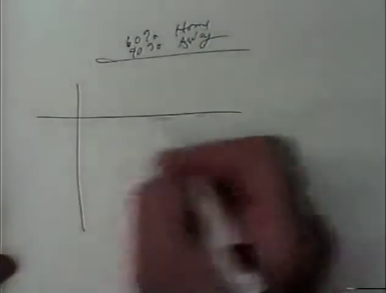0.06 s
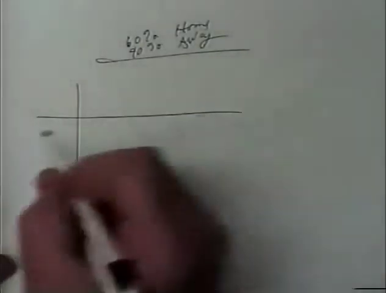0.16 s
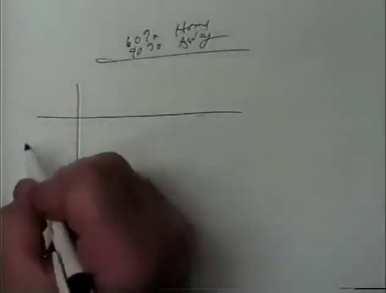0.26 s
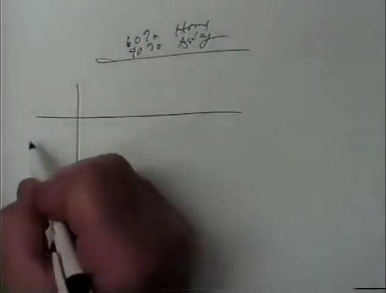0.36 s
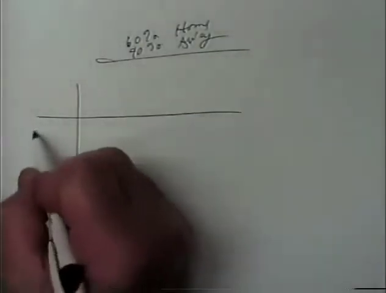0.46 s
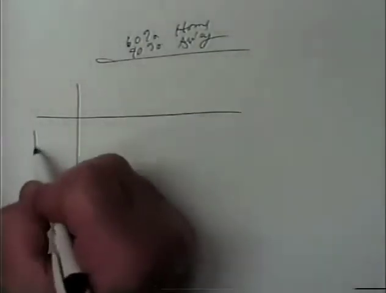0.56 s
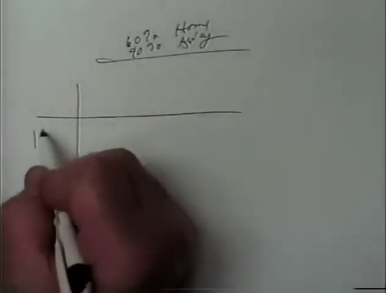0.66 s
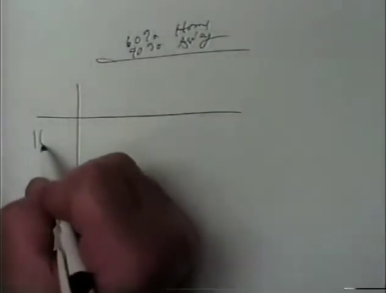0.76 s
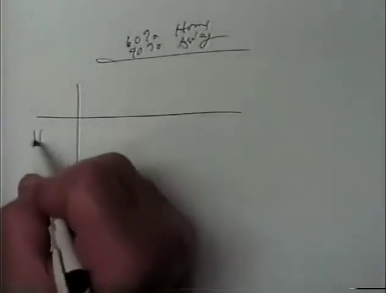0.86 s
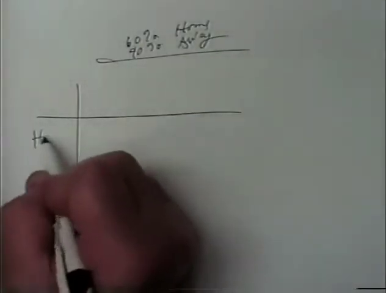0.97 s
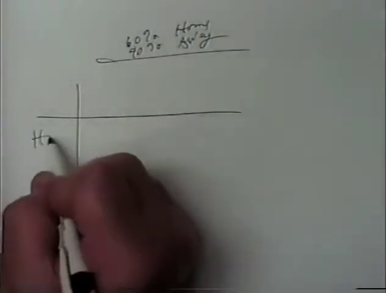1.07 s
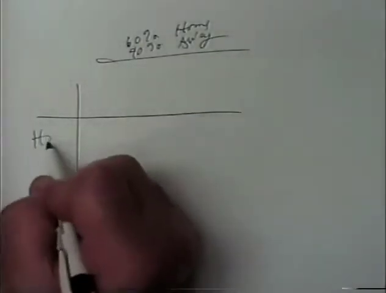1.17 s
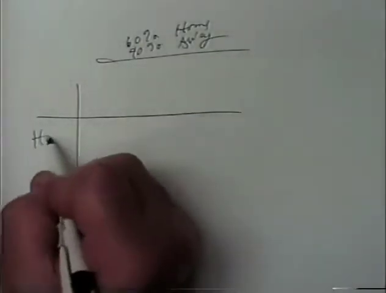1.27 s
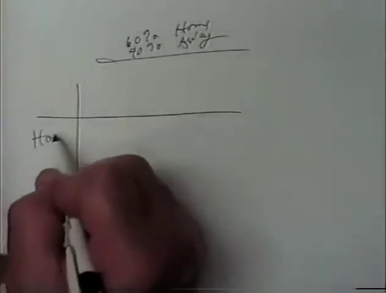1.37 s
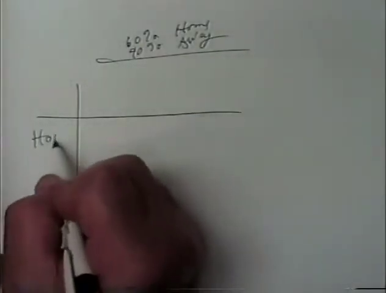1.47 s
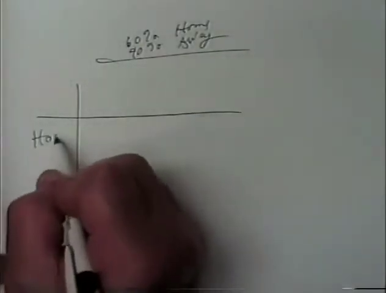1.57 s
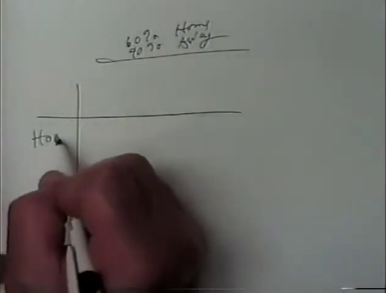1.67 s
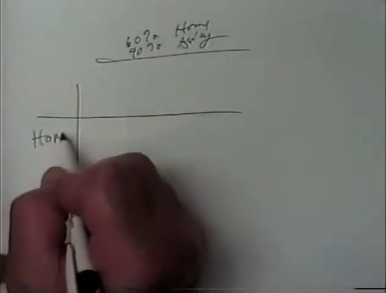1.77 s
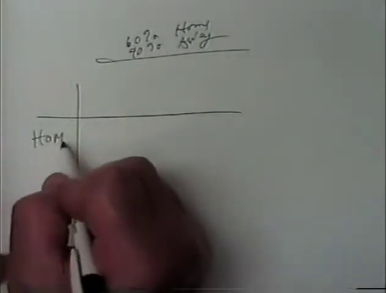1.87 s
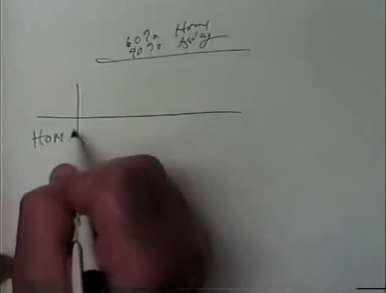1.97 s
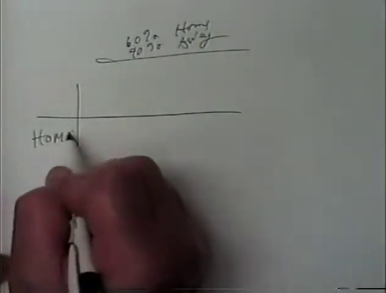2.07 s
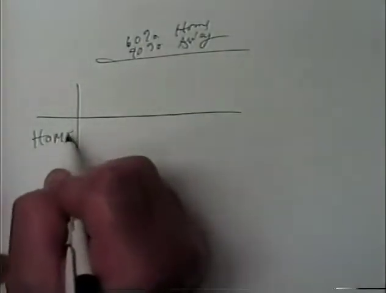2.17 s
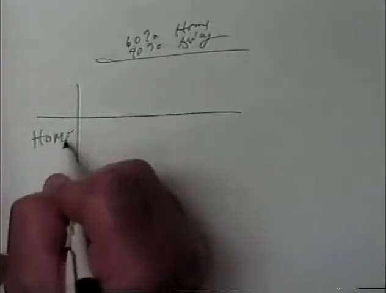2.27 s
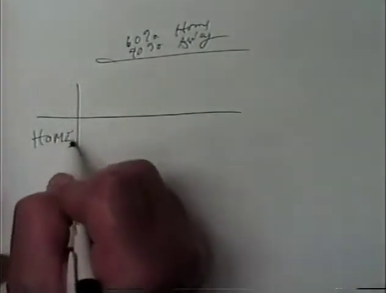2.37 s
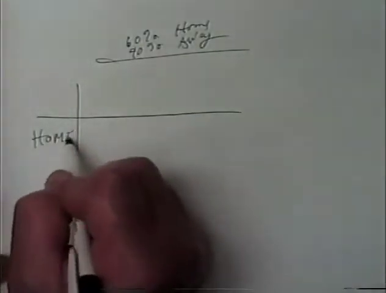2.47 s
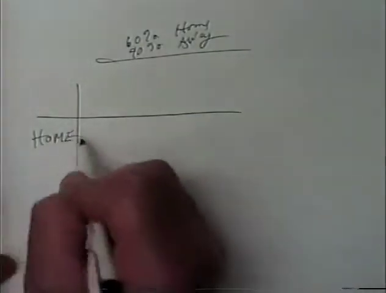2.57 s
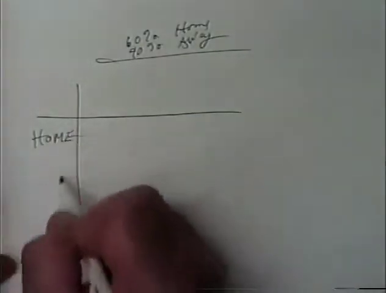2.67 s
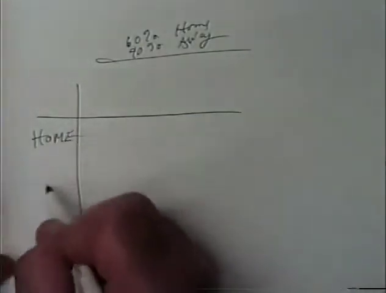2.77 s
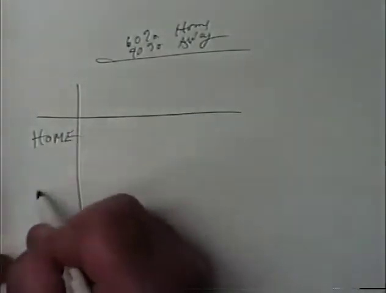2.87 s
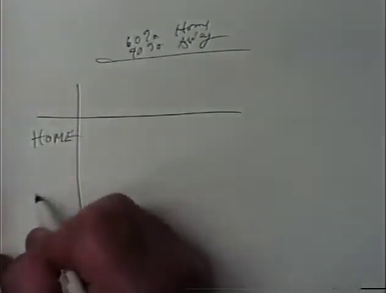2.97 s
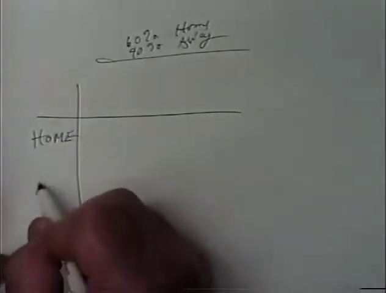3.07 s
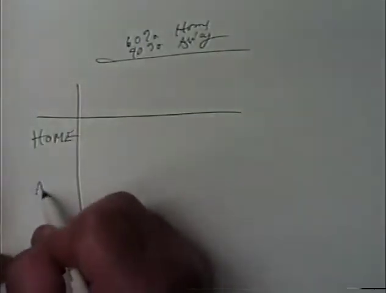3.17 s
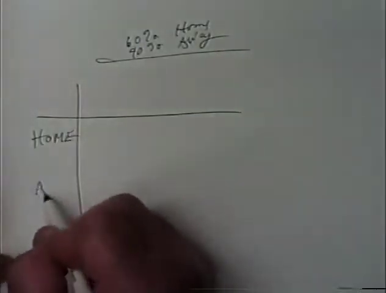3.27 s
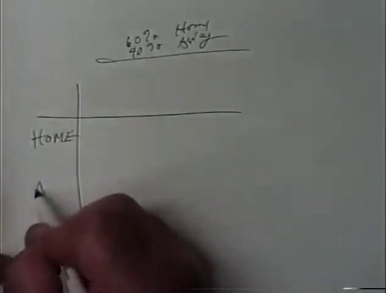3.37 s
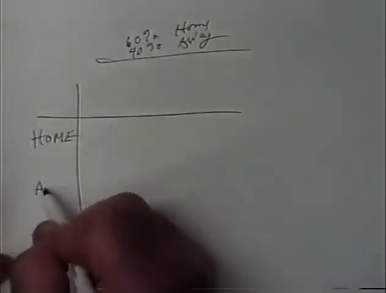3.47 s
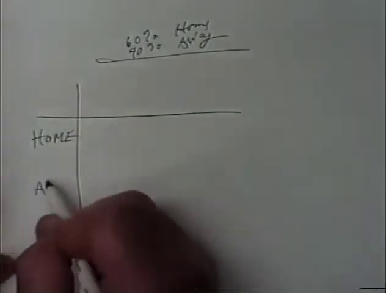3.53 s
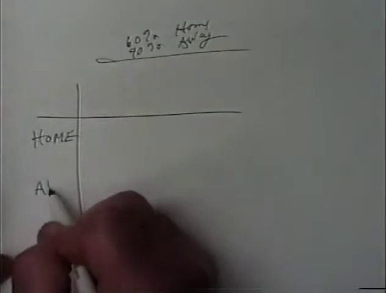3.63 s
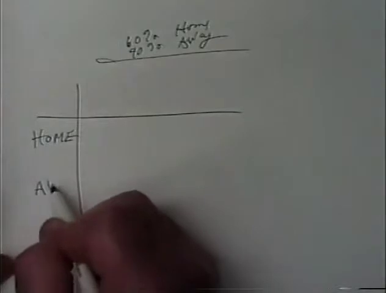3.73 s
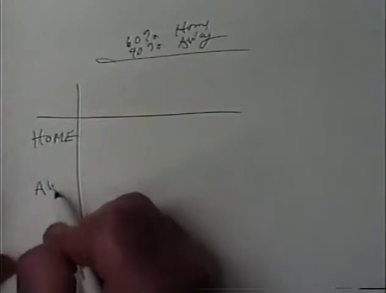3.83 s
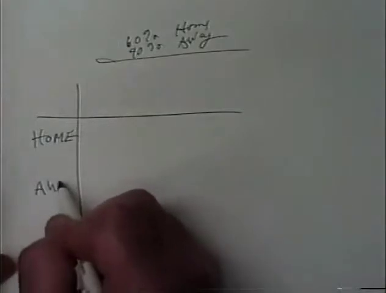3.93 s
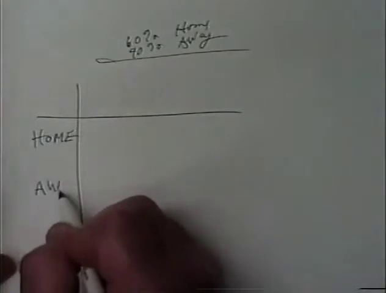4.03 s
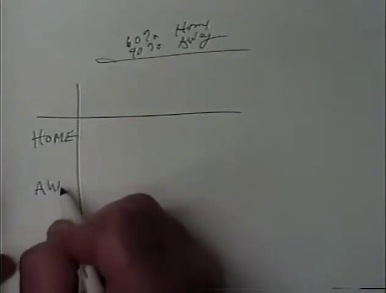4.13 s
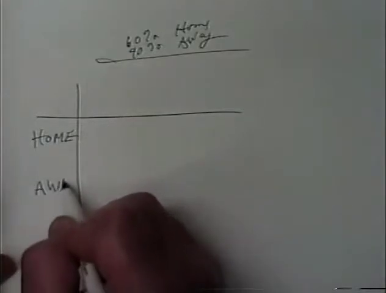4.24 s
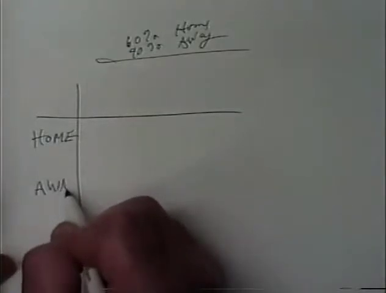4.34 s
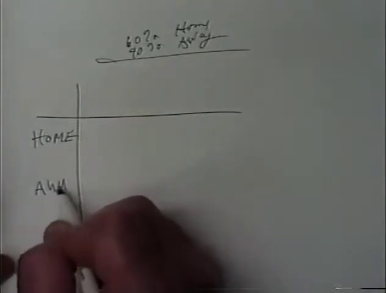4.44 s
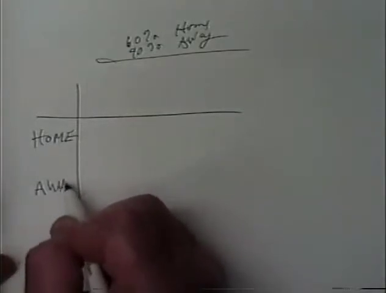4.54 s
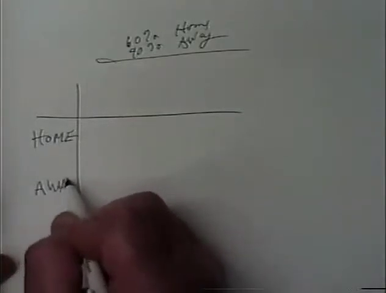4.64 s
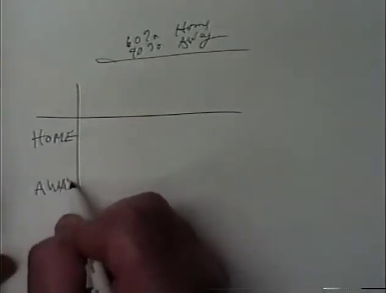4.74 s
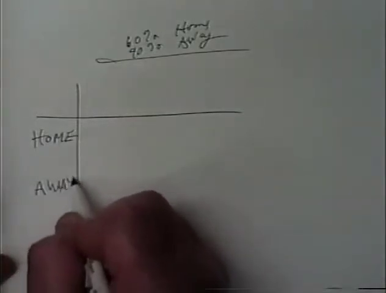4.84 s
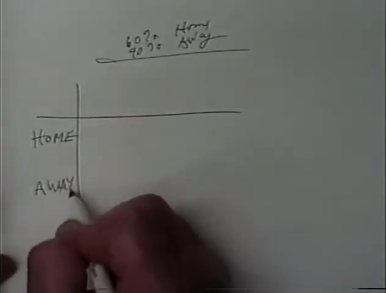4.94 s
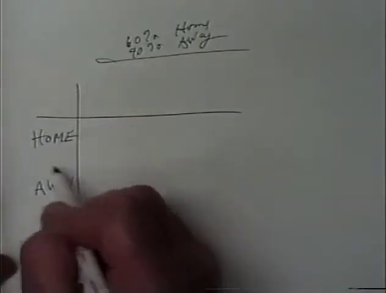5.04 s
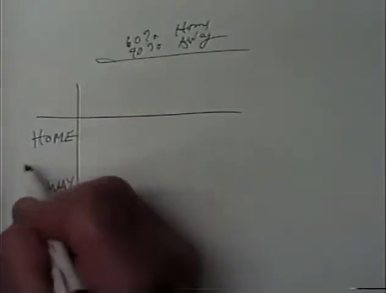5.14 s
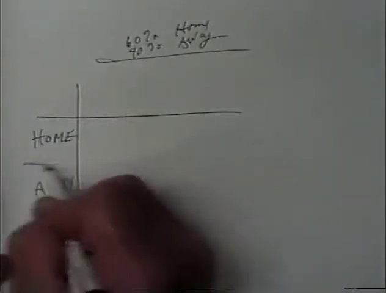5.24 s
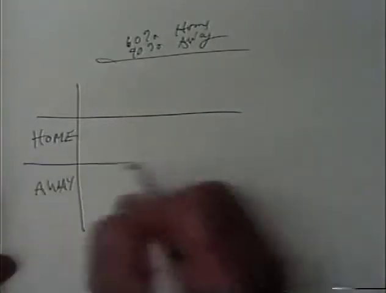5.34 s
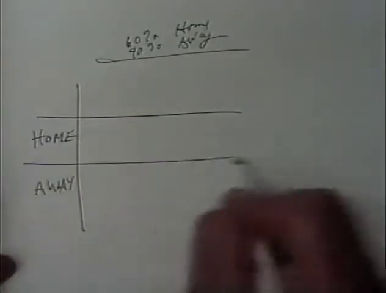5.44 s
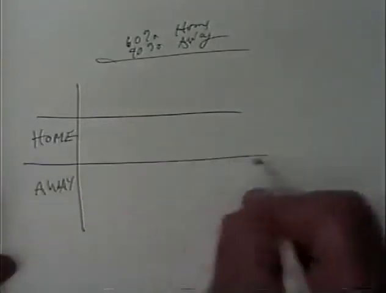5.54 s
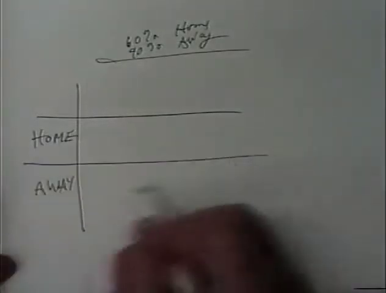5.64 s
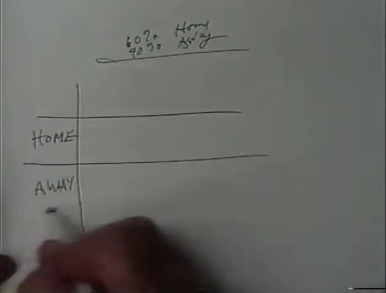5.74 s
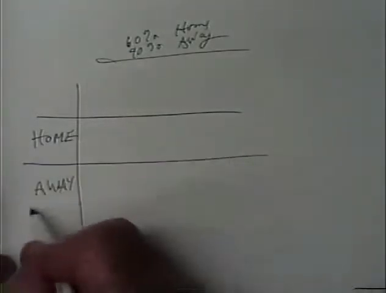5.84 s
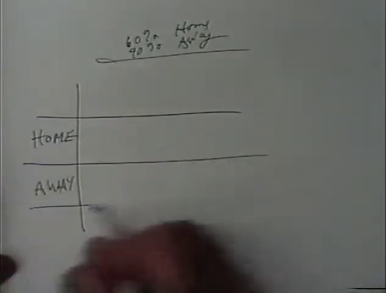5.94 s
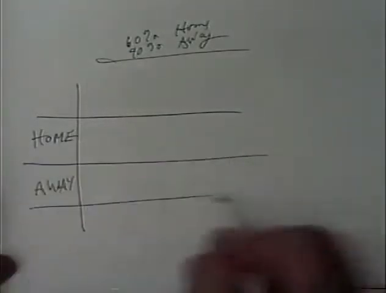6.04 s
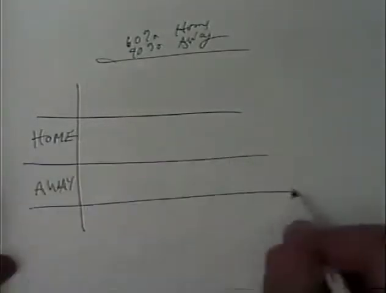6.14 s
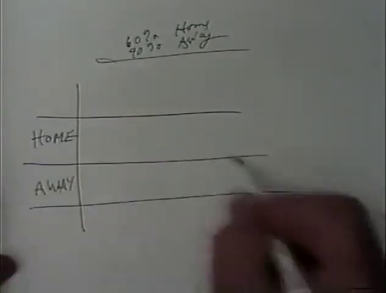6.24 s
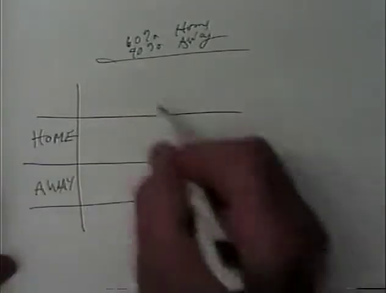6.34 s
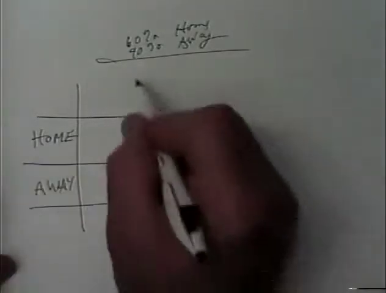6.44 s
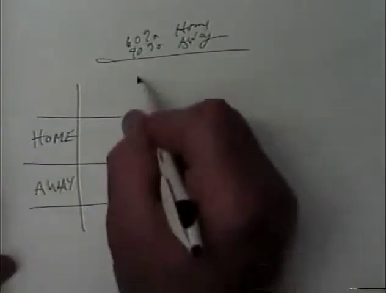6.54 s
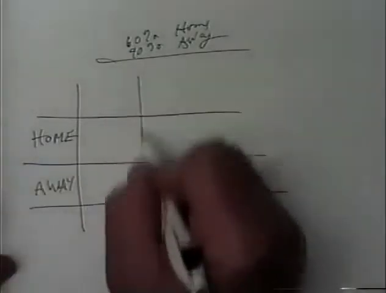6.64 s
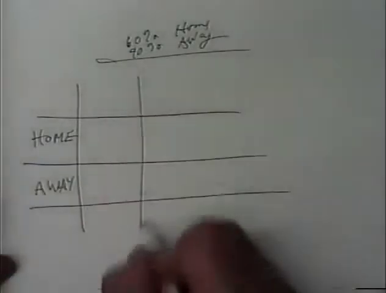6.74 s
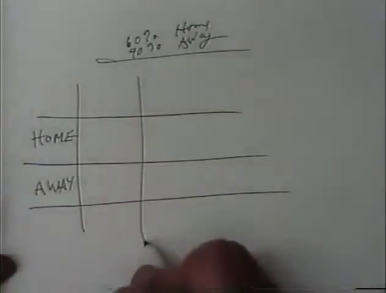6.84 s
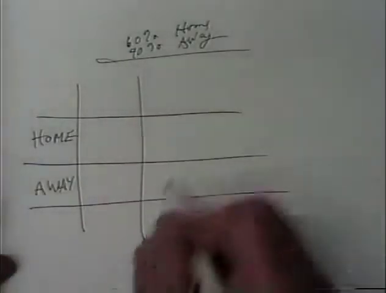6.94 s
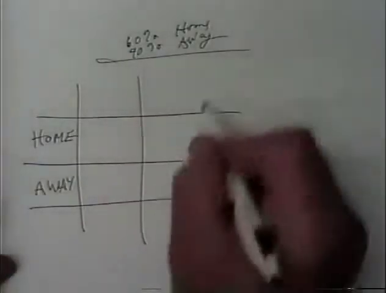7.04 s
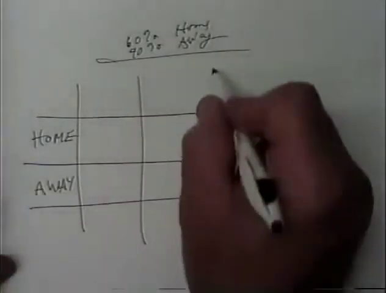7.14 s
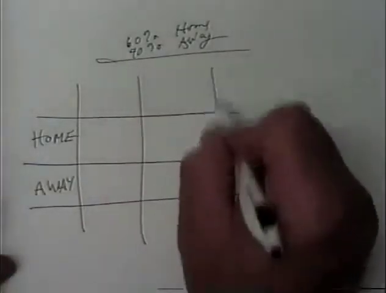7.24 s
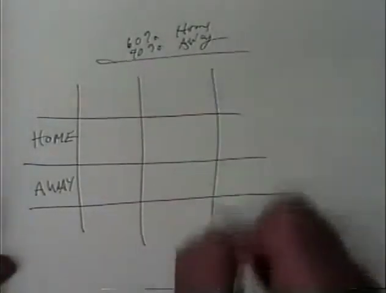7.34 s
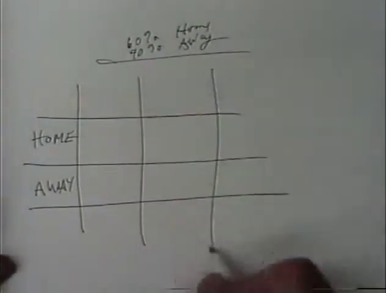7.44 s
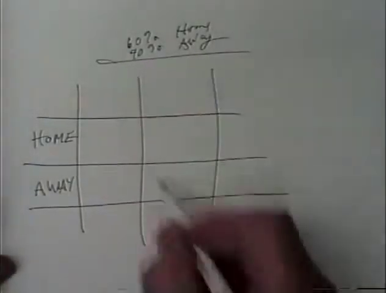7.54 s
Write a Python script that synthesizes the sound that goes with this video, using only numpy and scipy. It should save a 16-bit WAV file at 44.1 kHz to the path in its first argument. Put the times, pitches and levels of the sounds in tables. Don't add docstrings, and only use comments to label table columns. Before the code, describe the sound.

Close, plain sound in a small room with a short reverberation. Throughout, a low 60-hertz hum beats slowly, about once a second, with a fan motor, under soft hiss and a very thin, high steady whistle. At 0 seconds the tail of a long felt-pen scrape dies away. From 0.6 to 2.7, the tip lands with small woody taps and ticks, followed by short, dry, slightly hollow scratches in uneven rhythm; a faint skin rustle brushes paper around 1.4. After a pause, a second similar burst runs from 3.1 to 5.1. Then long ruled strokes: knock at 5.3, scrape swelling to 5.55; firmer thud at 5.95, scrape peaking at 6.2; knock at 6.67, swipe peaking at 6.86; faint hand rustle from 7, strongest thud at 7.3, last swipe peaking near 7.5. Each swipe rises brighter and hissier, then drops quickly.

```python
import sys
import numpy as np
from scipy import signal
from scipy.fft import rfft, irfft
from scipy.io import wavfile
from scipy.ndimage import uniform_filter1d

SR = 44100
rng = np.random.default_rng(int(sys.argv[2]) if len(sys.argv) > 2 else 0)


def inscribe(sig):
    pcm = np.round(np.clip(np.atleast_2d(sig).T, -1, 1) * 32767)
    wavfile.write(sys.argv[1], SR, pcm.astype(np.int16))


def volts(x):
    e = np.asarray(x, float) / 20
    return 10 ** e


N = 335248

# fastest moment t/s, length/s, ring level/dB, flexing re ring/dB, scrape re ring/dB
FIRST_WORD = [(0.682, 0.062, -33.5, -13, -21.5), (0.726, 0.04, -64, -2, -10),
              (0.888, 0.07, -37.5, -25, -16), (1.096, 0.064, -37, -11, -18.5), (1.127, 0.05, -43, -4, -20),
              (1.292, 0.13, -53.5, 4.5, -18), (1.373, 0.049, -47.5, 6.5, -12.5),
              (1.619, 0.059, -46.5, 1, -15), (1.715, 0.064, -40.5, 0, -20), (1.798, 0.046, -50, 4, -20),
              (1.88, 0.074, -55.5, 8.5, -16), (1.966, 0.073, -41.5, -4, -18.5), (2.2, 0.05, -57, 8, -5),
              (2.228, 0.034, -60, 13.5, -9), (2.347, 0.083, -55, 11.5, -12), (2.453, 0.084, -54.5, 8, -15),
              (2.498, 0.042, -60, -1, -12), (2.658, 0.067, -40.5, -10, -14.5), (2.804, 0.05, -64, 1, -10)]
SECOND_WORD = [(3.101, 0.034, -57, -9, -9), (3.189, 0.059, -44.5, 0, -14), (3.218, 0.043, -41, 4.5, -15),
               (3.306, 0.11, -41, -1, -16), (3.397, 0.05, -67, -5, -11), (3.57, 0.093, -52, -3, -15),
               (3.766, 0.07, -43.5, 1, -13.5), (3.884, 0.06, -52.5, 8.5, -12),
               (3.96, 0.033, -40.5, -5, -20), (4.04, 0.064, -37.5, 2, -19), (4.132, 0.053, -47.5, -6, -9),
               (4.226, 0.034, -56.5, 16, -4), (4.318, 0.097, -41, 2, -16.5), (4.41, 0.031, -38.5, -10, -16),
               (4.462, 0.078, -52, -2, -13), (4.546, 0.05, -53, 8, -9), (4.621, 0.064, -51.5, -1, -12),
               (4.819, 0.15, -61, 2, 1), (5.022, 0.074, -37.5, -3, -21), (5.056, 0.019, -40, -9, -17)]
# down t/s, up t/s
WORD_SPANS_S = [
    (.6, 2.9),
    (3.09, 5.15),
]
# ring, flexing, scrape, bright scrape [dB/dB]
LETTER_SLOPES = [1.35, 0.79, 0.99, 0.84]
# ring, flexing, scrape, bright scrape [level/dB]
RESTING_DB = [-72.5, -61.5, -79, -74]

# fastest moment t/s, speeding up/s, slowing down/s, scrape level/dB
RULES = [
    (0.044, 0.6, 0.15, -26),
    (5.55, 0.2137, 0.16, -27.5),
    (6.2, 0.22, 0.13, -26.5),
    (6.858, 0.1726, 0.14, -27.5),
    (7.486, 0.17, .13, -25),
]
# ring/dB, flexing/dB, bright scrape/dB, felt hiss/dB, lag of ring peak/s
RULE_BALANCE = [(-9.5, -8.5, -4, -20, 0.027), (-3.5, -8.5, -2.5, -18.5, 0.027),
                (-6.5, -12, -1.5, -17, 0.032), (-9, -12.5, -13, -22, 0.073),
                (-10.5, -15.5, -10, -20.5, 0.068)]
# ring, flexing, scrape, bright scrape, hiss [dB/dB]
RULE_RISE_SLOPES = [0.43, 0.47, 1.01, 1.18, 0.87]
# same, slowing down as pressure eases [dB/dB]
RULE_FALL_SLOPES = [1.15, 0.98, 1.01, 1.32, 1.15]

# f/Hz, level/dB, t60/s
THUD_MODES = [(150.4, 7.5, .11), (178, -3.5, 0.13), (204.3, -13, 0.47)]
# f/Hz, level/dB, t60/s
RING_MODES = [(313, -23, 0.069), (358.6, -6, 0.15), (393.2, -9.5, 0.21), (461.6, 6.5, 0.068),
              (490.5, -7, 0.2), (538, -13.5, 0.3), (594, -11, 0.079)]
# f/Hz, level/dB, t60/s
TAP_MODES = [(712, -8.5, 0.059), (886, -16.5, 0.19), (944, -8, 0.074), (1052, 17, 0.017),
             (1153, 11.5, 0.018), (1288, -5, 0.065), (1435, -8, 0.091), (1540, -4.5, 0.037)]
# level added to each ring mode/dB, a row an area
AREA_RING_DB = [
    [22.5, -7.5, -11, 3.3, -11.5, 0, -45],
    [9, 7, 0, 1, -7, 0, -39],
    [9, 7, 7, 1, -4, 0, 22],
    [-11, 7, 8, -0.5, -6, 0, -3],
    [-13, 9.5, 7.5, 0, -5, 0, 4],
]
# f/Hz, level per Hz/dB
MARGIN = [(390, -32), (660, -5), (727, -19.5), (867, -16), (1040, 7.5), (1320, -12), (1520, -6),
          (2390, -15.5), (2850, -12), (4500, -24.5), (5850, -54), (9900, -120)]
FAR_RIGHT = [(390, -45), (660, -15), (966, -6.5), (1140, -7), (1250, 2), (1360, -6), (1970, -9.5),
             (2140, -7.5), (2520, -14), (2740, -7), (2960, -20), (5000, -33.5), (6500, -62), (11000, -120)]
ACROSS = [(390, -41), (660, -15), (918, 4), (1000, -9), (1060, 0.5), (1700, -3.5), (2140, -2), (2520, -21),
          (2740, -6.5), (3140, -18.5), (3980, -19.5), (5000, -28), (6500, -58), (11000, -120)]
DOWN = [(390, -46), (660, -15), (911, -2.5), (983, -10.5), (1190, 2), (1330, -2.5), (1440, -5.5),
        (1720, -15), (2250, -23), (2790, -22), (3110, -27.5), (5000, -36.5), (6500, -65), (11000, -120)]
# f/Hz, level per Hz/dB
FELT = [(2650, -24), (4500, -33), (5100, -4.5), (6810, -0.5), (7910, -4.5), (8730, -0.5), (13000, -12.5),
        (15000, -12), (15500, -15)]

# t/s, peak level/dB, thud level/dB, ring re peak/dB, tick re peak/dB
LANDINGS = [(0.594, -29.5, -29, -10.5, -7.5), (0.832, -30.5, -30, -8, -11), (1.033, -34, -35, -10, -16.5),
            (1.571, -36, -34.5, -10, -17), (2.123, -31, -30.5, -11, -9.5), (2.19, -52, -41, -3, -9),
            (2.35, -52, -52, -2, -14), (2.444, -59, -45, 13, -7), (2.604, -29.5, -28.5, -11.5, -11.5),
            (2.794, -47.5, -56, -21, -0.5), (3.079, -38, -41, -18, -26), (3.223, -48, -50, 3.5, -8),
            (3.274, -52, -61, 1, -8), (3.513, -30, -31.5, -15.5, -19), (3.729, -29.5, -30.5, -14.5, -21),
            (4.395, -56, -33, -8, -7), (4.773, -33, -32, -12, -17), (4.959, -37, -33, -9, -12),
            (5.305, -30.5, -32, -11, -17), (5.953, -23.5, -26, -16, -10.5), (6.666, -27, -25.5, -16, -11),
            (7.31, -21, -19.5, -17.5, -10.5)]
CATCHES = [(1.091, -41.5, -49, 4, -9), (1.717, -61, -45, -2, -3), (2.355, -51, -34, 3, -13),
           (3.177, -58, -47, 6, -9), (3.885, -51, -51, 1, -15), (3.955, -64, -41, 5, -9),
           (4.039, -50, -34, 1, -11), (4.086, -63, -37.5, 7, -9), (4.228, -56, -50, 0, -12),
           (4.324, -54, -35.5, -1, -5)]
# f/Hz, level per Hz/dB
TICK = [(970, -30), (1650, 6), (2080, 3.5), (2460, -2), (3080, -7), (3400, -1.5), (4110, -12.5),
        (4940, -20), (5360, -17.5), (12000, -19.5), (15600, -54), (22000, -120)]

# t/s, level/dB
HAND = [
    [(1.4, -64), (1.43, -73), (1.498, -65), (1.56, -73)],
    [(6.96, -63), (7.032, -66.5), (7.274, -64), (7.284, -83), (7.3, -47)],
]

# f/Hz, t60/s
ROOM = [(150, 0.31), (500, 0.41), (1300, 0.45), (3000, 0.43), (8000, 0.33)]
HUM_DB = [-53.5, -100, -72, -69.5, -72, -66.5, -72, -107, -83, -74.5, -80, -75.5, -73, -75]
# t/s, level/dB
SCAN = [(0.0, -63), (0.7, -60.5), (5.6, -62), (6.45, -71), (7.1, -67), (7.6, -60)]
# f/Hz, level per Hz/dB
FLOOR = [(12, -39), (20, -2.5), (47, 3), (81, -4.5), (122, -1.5), (145, -1), (196, -16), (363, -10),
         (405, -21), (536, -10), (770, -21), (1080, -16.5), (2550, -25.5), (14300, -28), (15600, -24.5)]


def strokes():
    fine = evened(slips(5000, spread_db=2.5))
    coarse = evened(slips(2000, spread_db=1.5))
    t = np.arange(N) / SR
    lines = list(zip(RULES, RULE_BALANCE))
    areas = [word(t, rows, *span) for rows, span in zip([FIRST_WORD, SECOND_WORD], WORD_SPANS_S)]
    areas += [ruled(t, rows) for rows in (lines[:1], lines[1:3], lines[3:])]
    grip_db, grip_s = 1, 0.018
    grip = volts(grip_db * evened(uniform_filter1d(rng.standard_normal(N), round(grip_s * SR))))
    out = np.zeros(N)
    for gains, colour, ring_db in zip(areas, [MARGIN, MARGIN, FAR_RIGHT, ACROSS, DOWN], AREA_RING_DB):
        heard = np.flatnonzero(gains.max(0) > 1e-5)
        start_s, span = heard[0] / SR, slice(heard[0], heard[-1])
        ring, flex, scrape, bright = (gains * grip)[:4, span]
        fibres = fine[span] * rng.choice([-1., 1.], (6, N))[:, span]
        panel = [(hz, db + d, t60_s) for (hz, db, t60_s), d in zip(RING_MODES, ring_db)]
        low_plate = dense_modes(colour, 644.0, 1673, t60_s=0.045, count=50)
        high_plate = dense_modes(colour, 1693, 5174, t60_s=0.03, count=120)
        add(out, start_s, shake(flex * coarse[span], THUD_MODES))
        add(out, start_s, shake(ring * coarse[span], panel))
        add(out, start_s, travel(scrape * fibres, low_plate, turns_hz=9.5))
        add(out, start_s, travel(bright * fibres, high_plate, turns_hz=11.5))
    hiss_gain = grip * ruled(t, lines)[-1]
    felt_spectrum = volts(read(FELT, np.fft.rfftfreq(N, 1 / SR)))
    felt = irfft(rfft(slips(9000, spread_db=1.5)) * felt_spectrum, N)
    return out + hiss_gain * evened(felt)


def word(t, rows, down_s, up_s):
    rise_share, curve, bright_re_scrape_db = 0.44, 1.55, -7.5
    resting = np.clip(np.minimum(t - down_s, up_s - t) / 0.099, 0, 1)
    power = (volts(np.array(RESTING_DB))[:, None] * resting) ** 2
    for top_s, length_s, db, flex_db, scrape_db in rows:
        near = abs(t - top_s) < 0.3
        rise_s, fall_s = 2 * rise_share * length_s, 2 * (1 - rise_share) * length_s
        arch_db = speed_db(t[near], top_s, rise_s, fall_s, curve)
        levels_db = db + np.array([-2.5, flex_db, scrape_db, scrape_db + bright_re_scrape_db])
        power[:, near] += volts(levels_db[:, None] + np.outer(LETTER_SLOPES, arch_db)) ** 2
    return np.sqrt(power)


def ruled(t, rows):
    curve, lift_db_per_s, drag_db, drag_s = 1.854, -400, -27, 0.2
    gains = np.zeros((5, len(t)))
    for (top_s, rise_s, fall_s, db), (ring_db, flex_db, bright_db, hiss_db, late_s) in rows:
        arch_db = speed_db(t, top_s, rise_s, fall_s, curve)
        late_db = speed_db(t, top_s + late_s, rise_s + late_s, fall_s - late_s, curve)
        levels_db = db + np.array([ring_db, flex_db, 0, bright_db, hiss_db])[:, None]
        slopes = np.where(t < top_s + late_s, np.c_[RULE_RISE_SLOPES], np.c_[RULE_FALL_SLOPES])
        follow_db = slopes * [late_db, late_db, arch_db, arch_db, arch_db]
        lift_db = lift_db_per_s * np.maximum(t - top_s - fall_s, 0)
        sweep = volts(levels_db + follow_db + lift_db)
        drag = volts(drag_db + speed_db(t, top_s + fall_s, fall_s, drag_s, curve))
        trail = volts(levels_db) * np.c_[[0, 0, 1, 1, 1]] * drag
        gains += (sweep + trail) * (t > top_s - rise_s)
    return gains


def speed_db(t, top_s, rise_s, fall_s, curve):
    away = np.where(t < top_s, (top_s - t) / rise_s, (t - top_s) / fall_s)
    return -33 * away ** curve


def slips(per_s, spread_db):
    size = volts(spread_db * np.minimum(rng.exponential(1, N), 4)) * rng.choice([-1, 1], N)
    return size * (rng.random(N) < per_s / SR)


def ringing(modes):
    t = np.arange(SR // 4) / SR
    return sum(volts(db - 60 * t / t60_s) * np.sin(2 * np.pi * hz * t) for hz, db, t60_s in modes)


def shake(force, modes):
    response = ringing(modes)
    return signal.oaconvolve(force, response / np.linalg.norm(response))


def dense_modes(shape, lo_hz, hi_hz, t60_s, count):
    hz = np.linspace(lo_hz, hi_hz, count) * rng.uniform(0.99, 1.01, count)
    t = np.arange(SR // 8)[:, None] / SR
    strength = volts(read(shape, hz[:, None] * np.linspace(0.96, 1.04, 6)))
    strength = strength * rng.choice([-1., 1.], (count, 6))
    return (volts(-60 * t / t60_s) * np.sin(2 * np.pi * hz * t)) @ strength


def travel(forces, responses, turns_hz):
    count = responses.shape[1]
    forces = np.broadcast_to(forces, (count, forces.shape[-1]))
    phase = np.pi * turns_hz * np.arange(forces.shape[1]) / SR
    out = 0
    for k in range(count):
        fade = np.cos(phase + k * np.pi / count)
        out = out + signal.oaconvolve(forces[k] * fade, responses[:, k])
    return out / np.linalg.norm(responses) * np.sqrt(2)


def knocks():
    out = np.zeros(N)
    blow = np.r_[np.zeros(60), signal.windows.hann(70)]
    ticks = dense_modes(TICK, 1662, 12000, t60_s=0.089, count=300)
    rise = np.minimum(np.arange(SR // 4) / 206.0, 1)
    events = LANDINGS + CATCHES
    chances = rng.standard_normal((len(events), 14))
    for (s, peak_db, thud_db, ring_db, tick_db), z in zip(events, chances):
        tap, thud, ring = (ringing(varied(modes, z)) for modes in (TAP_MODES, THUD_MODES, RING_MODES))
        tick = ticks @ z[:6]
        layers = [(peak_db - 4.0, -rise * tap),
                  (peak_db + tick_db - 2.0, rise[:len(tick)] * tick),
                  (thud_db + 4.0, signal.oaconvolve(thud, blow)),
                  (peak_db + ring_db + 1.0, rise * ring)]
        for db, part in layers:
            add(out, s, volts(db) * part / abs(part).max())
    return out


def varied(modes, z):
    return [(hz * (1 + 0.023 * a), db + 3.1 * b, t60_s)
            for (hz, db, t60_s), a, b in zip(modes, z, z[::-1])]


def hand():
    gain = np.zeros(N)
    for rows in HAND:
        s, db = np.transpose(rows)
        at = np.arange(round(s[0] * SR), min(round(s[-1] * SR), N))
        gain[at] = volts(np.interp(at / SR, s, db))
    skin_band = signal.butter(2, [1800, 5600], "band", fs=SR)
    rustle = signal.lfilter(*skin_band, slips(6000, spread_db=2.0))
    return uniform_filter1d(gain, size=900) * evened(rustle)


def room(x):
    taps = np.zeros((3, SR // 2))
    at = np.arange(300, 22000, 20) + rng.integers(0, 20, (3, 1085))
    np.put_along_axis(taps, at, rng.choice([-1., 1.], at.shape), 1)
    hz, t, z = signal.stft(taps, SR, nperseg=256)
    decay = volts(-60 * t / read(ROOM, hz)[:, None])
    tails = signal.istft(z * decay, SR, nperseg=256)[1]
    return travel(x, tails.T, turns_hz=4.5)[:N]


def hum():
    mains_hz, scan_hz, scan_lag_turns = 60.0, 15735.92, 0.075
    beat_dip_s = 1.0
    t = np.arange(N) / SR - beat_dip_s
    start = 2 * np.pi * rng.random(len(HUM_DB))
    start[0] = 0
    mains = sum(volts(db) * np.sin(2 * np.pi * k * mains_hz * t + phase)
                for k, (db, phase) in enumerate(zip(HUM_DB, start), 1))
    whistle_gain = volts(np.interp(t + beat_dip_s, *np.transpose(SCAN)))
    whistle = whistle_gain * np.sin(2 * np.pi * (scan_hz * t - scan_lag_turns))
    motors = [(58.98, -61), (120.02, -53), (26.06, -90)]
    motor = sum(volts(db) * np.sin(2 * np.pi * hz * t) for hz, db in motors)
    return np.sqrt(2) * (mains + whistle - motor)


def floor():
    level_db, patch_db = -53.5, 0.9
    frames, hz = N // 512 + 5, np.fft.rfftfreq(2048, 1 / SR)
    a, b, patches = rng.standard_normal((frames, 1025, 3)).T
    patches = evened(uniform_filter1d(uniform_filter1d(patches, 20, 0), 8, 1))
    z = (a + 1j * b) * volts(read(FLOOR, hz)[:, None] + patch_db * patches)
    return volts(level_db) * evened(signal.istft(z, nperseg=2048, noverlap=1536)[1][:N])


def evened(x):
    return x / np.sqrt(np.mean(x ** 2) + 1e-20)


def read(points, hz):
    f, value = np.transpose(points)
    return np.interp(np.log(hz + 1), np.log(f + 1), value)


def add(mix, s, sound):
    part = mix[round(s * SR):][:len(sound)]
    part += sound[:len(part)]


def scene():
    board = signal.butter(4, 115, "high", fs=SR, output="sos")
    pen = signal.sosfilt(board, strokes() + knocks() + hand())
    room_db = -10
    mono = pen + volts(room_db) * room(pen) + hum() + floor()
    return np.array([mono, mono])


def roll_off(x):
    return signal.sosfilt(signal.butter(12, 15741, fs=SR, output="sos"), x)


def record(dry):
    apart = volts(-28.5) * signal.lfilter(*signal.butter(2, 220, fs=SR), dry[0])
    mix = dry + np.array([apart, -apart])
    return roll_off(mix)


dry = scene()
out = record(dry)
inscribe(out)
```